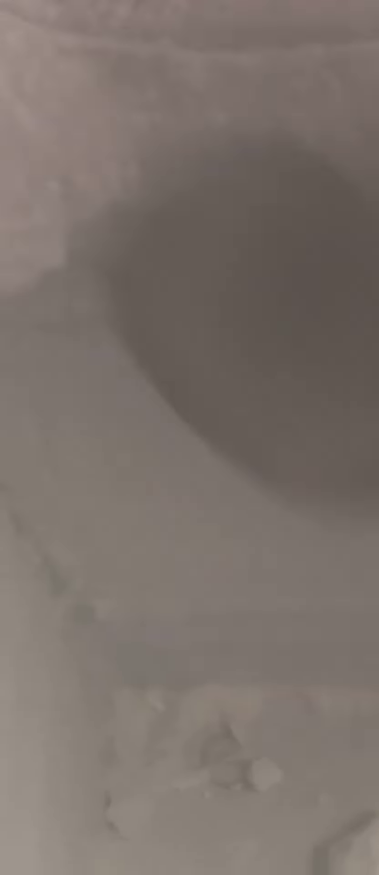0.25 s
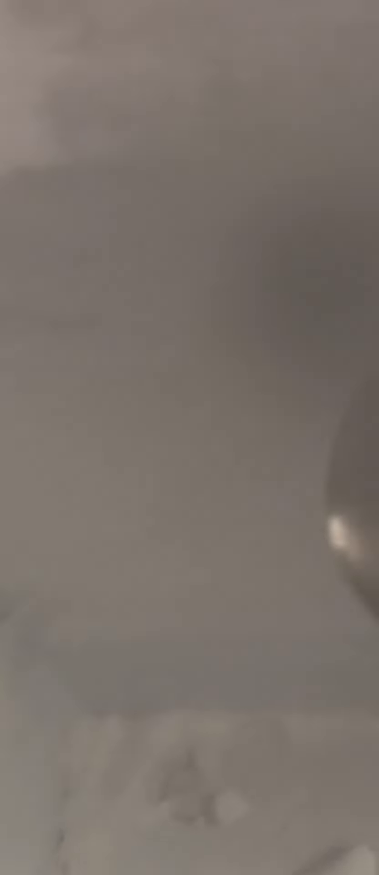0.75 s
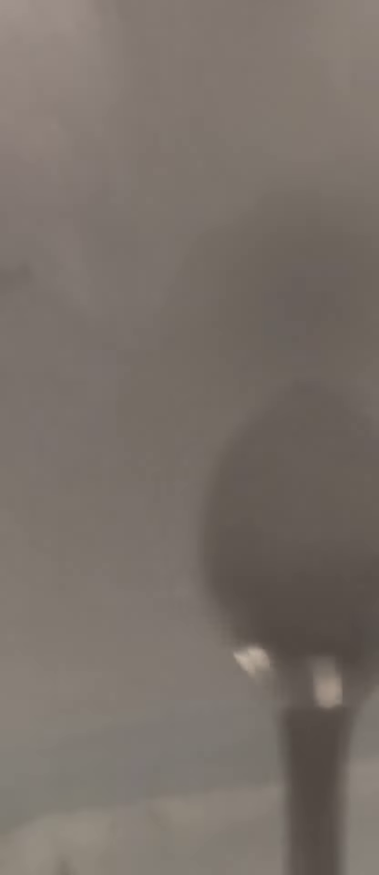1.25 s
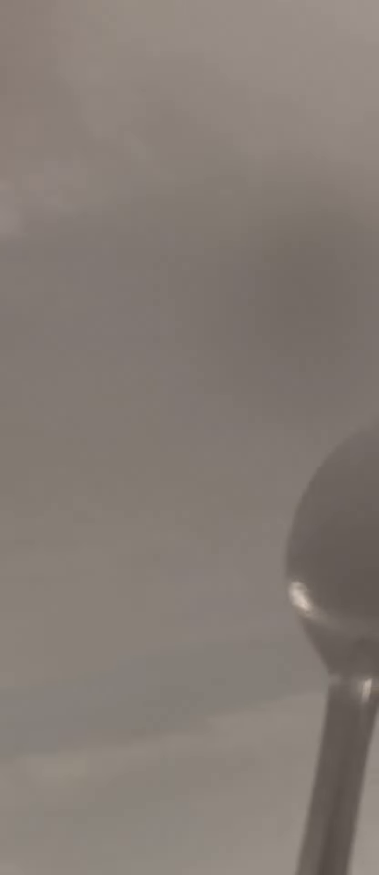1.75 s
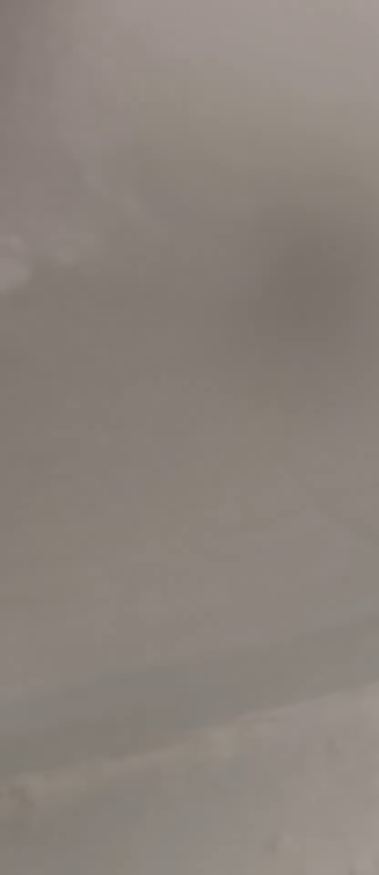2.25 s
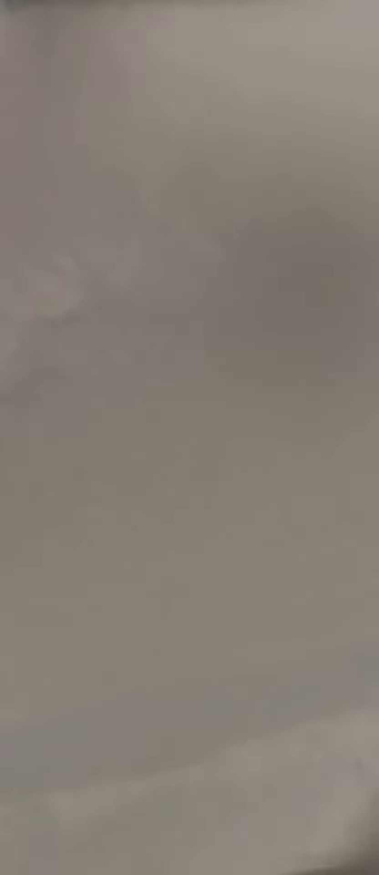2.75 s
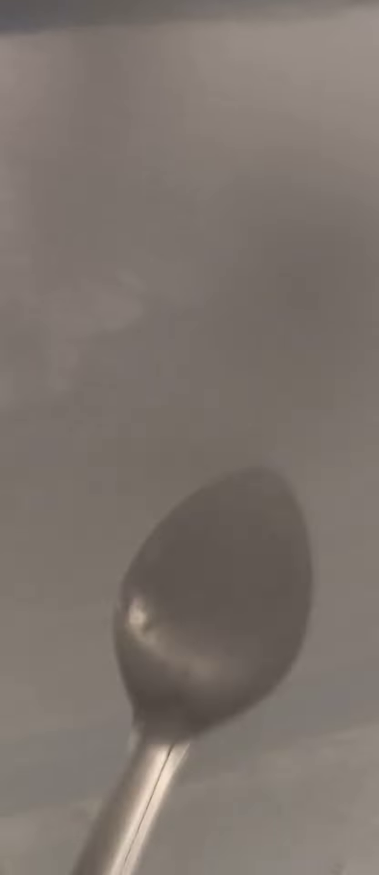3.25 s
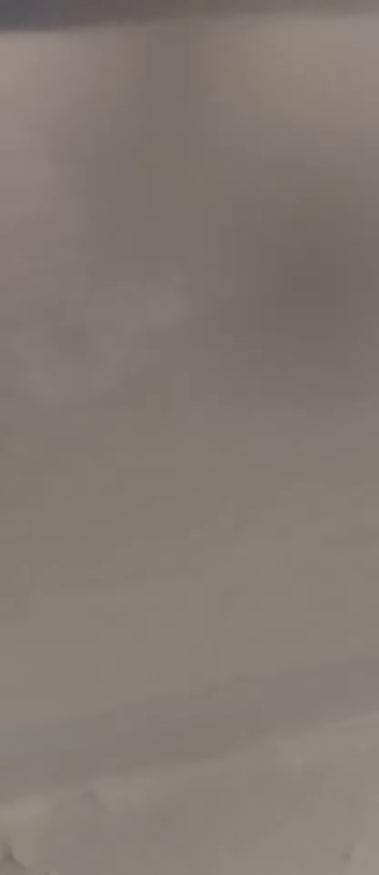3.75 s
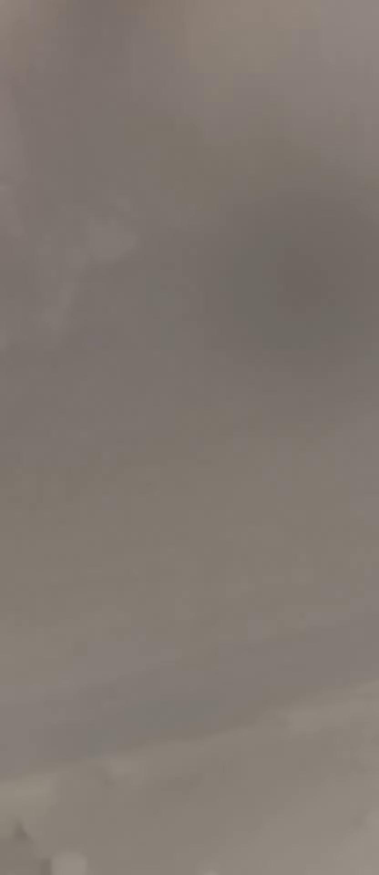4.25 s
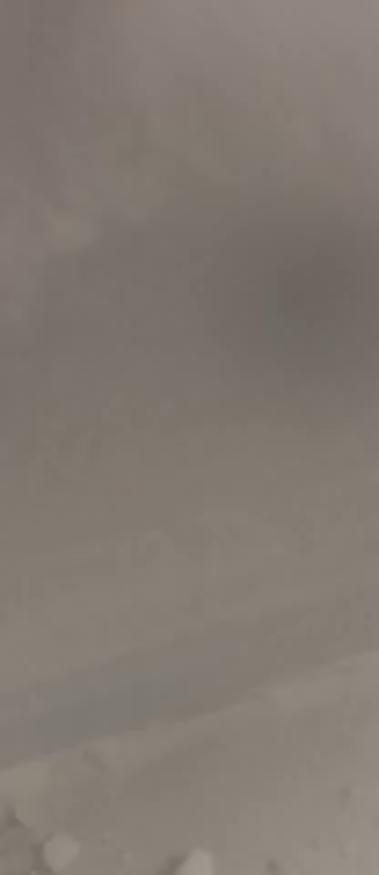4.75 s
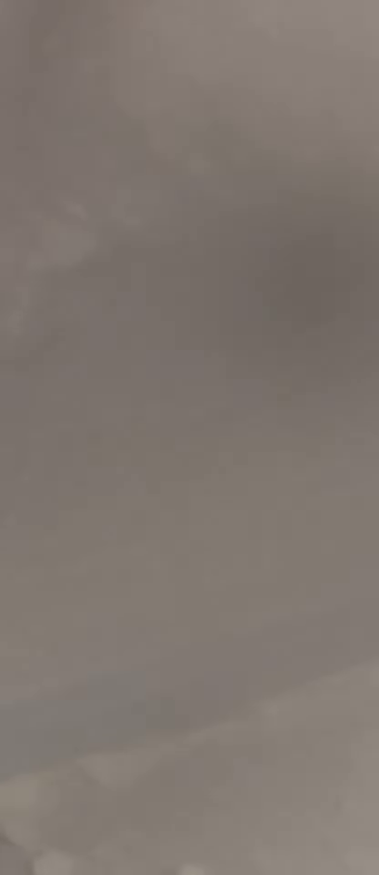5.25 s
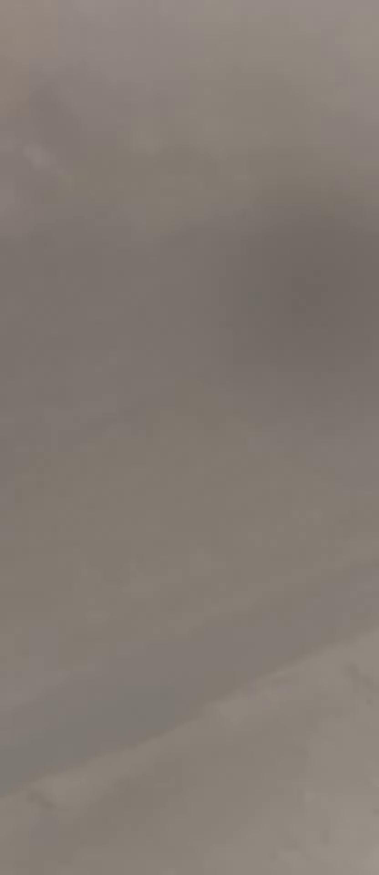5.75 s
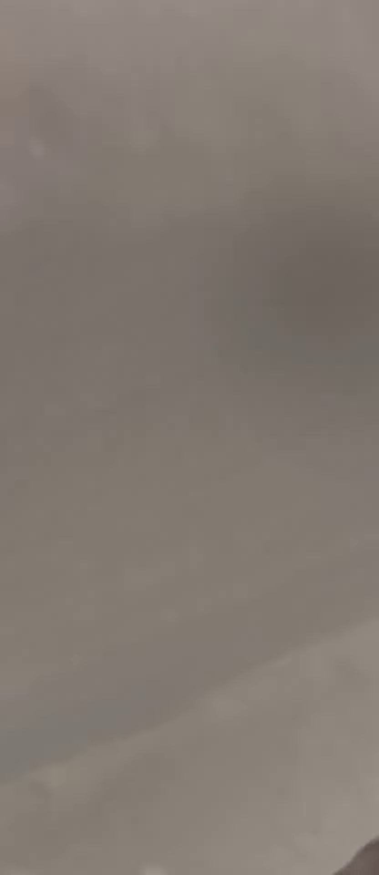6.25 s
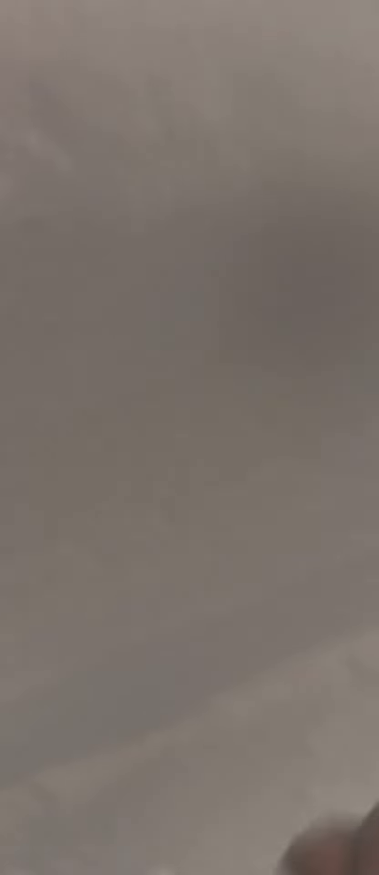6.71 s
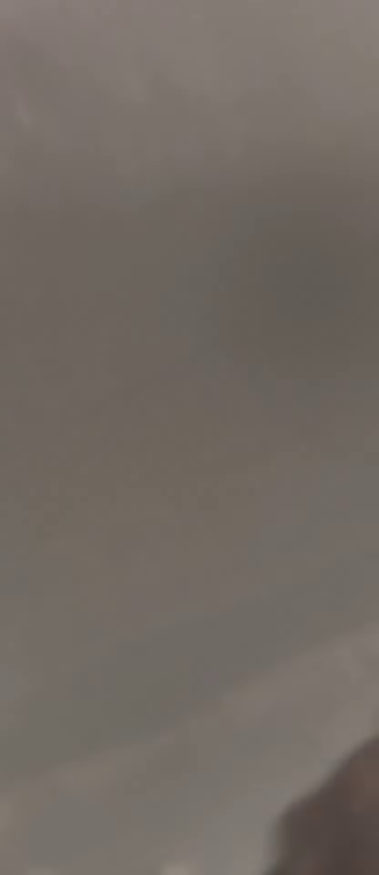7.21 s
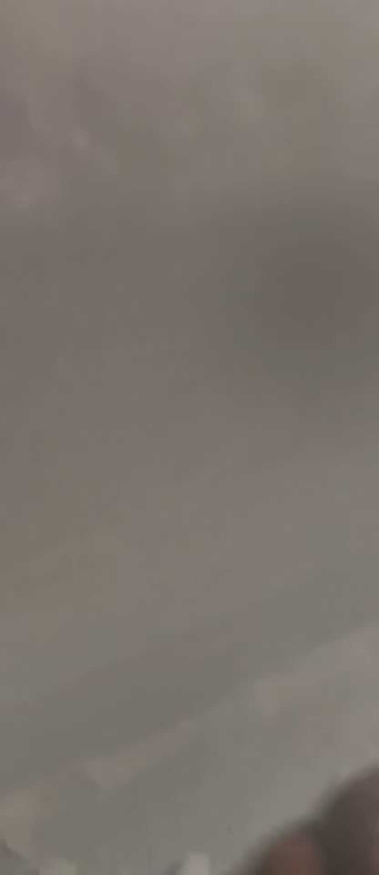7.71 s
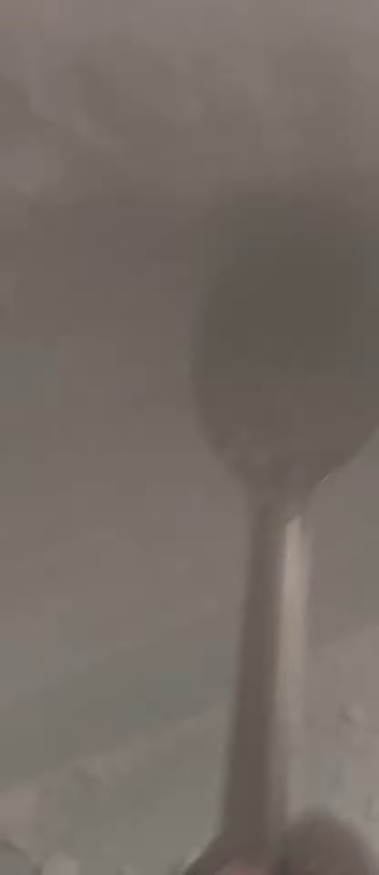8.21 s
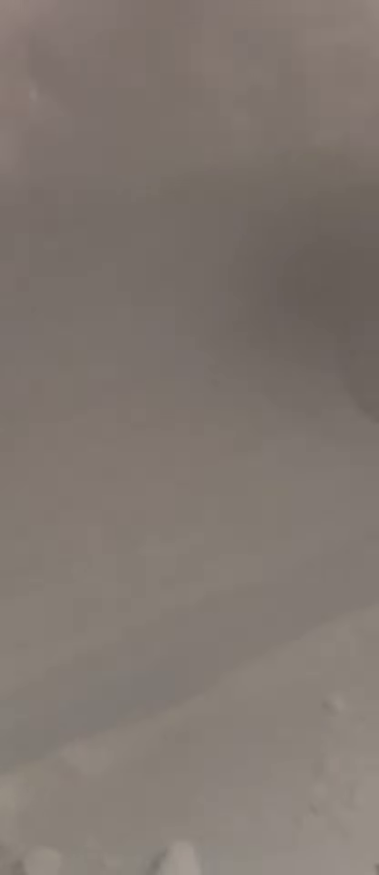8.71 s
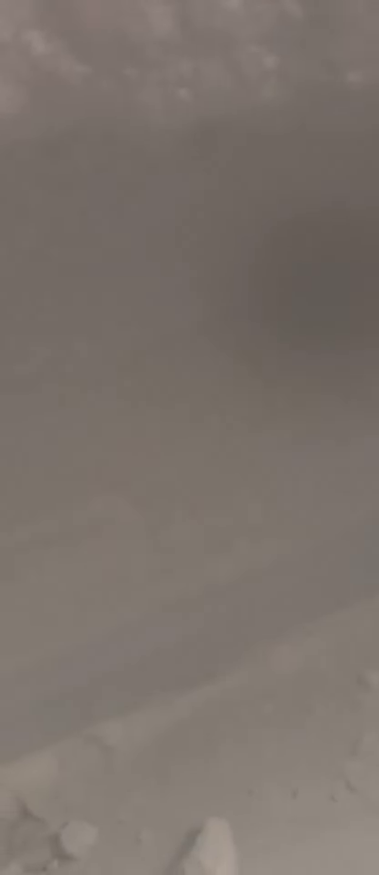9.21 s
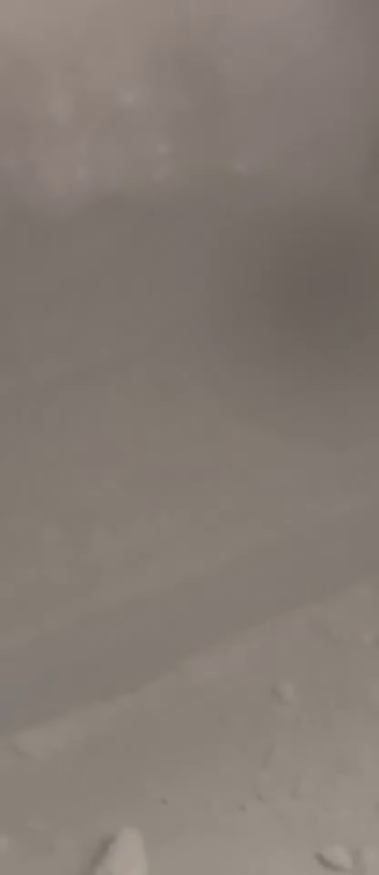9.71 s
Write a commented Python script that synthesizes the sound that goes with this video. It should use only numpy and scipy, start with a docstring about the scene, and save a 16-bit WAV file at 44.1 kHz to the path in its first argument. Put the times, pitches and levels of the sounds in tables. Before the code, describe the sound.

A metal spoon chips thick frost off a freezer wall, right beside a stereo microphone. Sparse light scrapes give way to deep hollow thuds, bright brittle cracks with short icy ringing, and gritty crumbling. The hits are irregular, loudest in the middle and later part; thin squeaky rubs follow near nine seconds. A steady low motor hum with airy rush lies underneath, drifting in level.

```python
"""Inside a freezer cabinet, a metal spoon chips and rasps thick frost off the wall, close to a two-port microphone.
Compressor and fan are steady tones and motor whines over shaped noise, on a background level that steps and drifts.
Knocks are short noise pushes ringing cabinet modes; ice cracks and crumbling drags are bursts of noise grains
that also ring the ice sheet; the spoon sings where rubbing grit drives its narrow modes."""
import sys
import numpy as np
from scipy import signal
from scipy.fft import rfft, irfft
from scipy.io import wavfile
from scipy.ndimage import uniform_filter1d

SR = 44100
rng = np.random.default_rng(int(sys.argv[2]) if len(sys.argv) > 2 else 0)


def to_wav(s):
    """Save 16-bit WAV."""
    ch = np.atleast_2d(s).T  # columns
    pcm = np.round(np.clip(ch, -1, 1) * 32767)  # PCM
    wavfile.write(sys.argv[1], SR, pcm.astype(np.int16))


N = 439677


def undb(db):
    """Amplitude factor for a level in dB."""
    return 10 ** (np.asarray(db) / 20)


def unit(x):
    """Bring to rms 1, all channels taken together."""
    return x / np.sqrt(np.mean(x ** 2))


def on_log(table, hz):
    """Read a (Hz, value) table on a log-frequency axis."""
    f, v = np.transpose(table)
    return np.interp(np.log(hz + 1), np.log(f), v)


def band(x, lo_hz, hi_hz):
    """Band-pass, brought to rms 1."""
    sos = signal.butter(2, [lo_hz, hi_hz], "band", fs=SR, output="sos")
    return unit(signal.sosfilt(sos, x))


def ring(x, hz, t60):
    """One damped mode as a complex one-pole resonator, losing 60 dB in t60 seconds."""
    pole = np.exp(2j * np.pi * hz / SR - np.log(1000) / (t60 * SR))
    return signal.lfilter([1], [1, -pole], x).imag


def width_t60(width_hz):
    """Ring time in seconds of a mode with this bandwidth: narrow modes ring long."""
    return np.log(1000) / (np.pi * width_hz)


def walk(rate):
    """Random levels held 1 / rate s and smoothed twice into a slow drift."""
    k = int(SR / rate)
    steps = np.repeat(rng.standard_normal(N // k + 1), k)
    return uniform_filter1d(uniform_filter1d(steps, k), k)[:N]


def add(out, start_s, sound):
    """Mix a short sound in at its time."""
    i = int(start_s * SR)
    out[:, i:i + sound.shape[1]] += sound[:, :N - i]


def air_rush():
    """Fan and cabinet air: shaped stereo noise, alike at both ports in the bass, each octave flickering alone."""
    # spectrum of the rushing air, relative: (frequency [Hz], density [dB per Hz])
    air_spectrum = [(30, -12.5), (62, -2), (112, -5), (132, -10.5), (160, -7), (300, -7), (350, -8),
                    (400, -12), (850, -16.5), (3000, -26.5), (7700, -37.5), (9760, -43.5), (14500, -39.5),
                    (16100, -52)]
    # likeness of the two ports: (frequency [Hz], left-right correlation [0-1])
    port_likeness = [(60, 0.98), (130, 0.86), (290, 0.63), (640, 0.04), (1410, 0.12), (3100, 0), (6820, 0),
                     (15000, 0.12)]
    # stereo balance: (frequency [Hz], left minus right [dB])
    port_balance = [(60, -3), (110, 1.5), (200, -2), (380, 1), (700, 2), (1290, 0.5), (2380, 1.5),
                    (4400, -1), (8120, 3), (15000, 0.5)]
    hz = np.fft.rfftfreq(N, 1 / SR)
    like = np.clip(on_log(port_likeness, hz), 0, .999)
    pan_db = on_log(port_balance, hz) / 2
    mid, side = rfft(rng.standard_normal((2, N))) * undb(on_log(air_spectrum, hz))
    common, apart = np.sqrt(1 + like) * mid, np.sqrt(1 - like) * side
    pair = np.array([undb(pan_db) * (common + apart), undb(-pan_db) * (common - apart)])
    rush = 0
    for centre_hz in 32 * 2. ** np.arange(10):
        octave = np.clip(1 - np.abs(np.log2((hz + 1) / centre_hz)), 0, 1)
        rush = rush + irfft(pair * octave, N) * undb(0.71 * walk(6))
    return unit(rush)


def motor_tones():
    """Compressor and fan tones: sines whose pitch and level waver slightly."""
    # pitches of the compressor and fan tones [Hz]
    tone_pitches = [58.5, 100.5, 113, 202, 226.2, 292.5, 339.3, 346, 360, 600, 720, 777, 834]
    # one row per pitch: (level re background [dB], left minus right [dB])
    tone_levels = [(-10, 1), (1.5, 1.2), (1, -1), (-18, -16), (6, 1.1), (-6.5, -5.5), (-9.5, -6.5),
                   (-9, -2), (-15, 3), (-15.5, 1), (-14.5, 5.5), (-18.5, -1), (-20, 0)]
    t, out = np.arange(N) / SR, np.zeros((2, N))
    for f, (db, pan_db) in zip(tone_pitches, tone_levels):
        wobble = np.cumsum(.0004 * f * walk(2)) / SR  # in cycles
        sine = np.sqrt(2) * np.sin(2 * np.pi * (f * t + wobble + rng.random()))
        out += sine * undb(db + 0.59 * walk(8.2)) * undb([[pan_db / 2], [-pan_db / 2]])
    return out


def motor_whines():
    """Faint whines of the motor: narrow noise bands with fluttering levels."""
    # (centre [Hz], width [Hz], level re background [dB])
    whine_bands = [(1310, 130, -16), (5100, 50, -30), (7780, 40, -29), (13600, 60, -33)]
    out = np.zeros((2, N))
    for f, width, db in whine_bands:
        noise = rng.standard_normal((2, N))
        out += band(noise, f - width / 2, f + width / 2) * undb(db + 4 * walk(2.5))
    return out


def appliance():
    """Rush, tones and whines of the freezer share one background level that steps and drifts."""
    # background level over time: (time [s], level [dB])
    background_level = [(0.0, -28.5), (2.36, -26.5), (2.52, -27.5), (2.66, -32.5), (3.0, -31), (3.22, -39),
                        (4.25, -39), (4.4, -32.5), (5.52, -33), (5.89, -29), (6.05, -35), (6.78, -37),
                        (7.44, -33), (8.11, -34), (8.75, -33), (9.1, -31), (9.97, -26.5)]
    air_db = 6.5  # re background
    level_db = np.interp(np.arange(N) / SR, *np.transpose(background_level))
    return (undb(air_db) * air_rush() + motor_tones() + motor_whines()) * undb(level_db)


def knocks():
    """The spoon judders into the ice for a few ms; that push rings the cabinet, deep modes swelling last."""
    # modes of the cabinet walls and air: (frequency [Hz], level within its group [dB], t60 [s])
    cabinet_modes = [(69.1, -3, 0.4), (80, -2, 0.099), (111.2, 3, 0.16), (182.3, -2.5, 0.34),
                     (223, -12.5, 0.35), (257, -7, 0.49), (285.2, 4, 0.2), (345, -8.5, 0.21),
                     (452, 4.5, 0.33), (508, 0, 0.39), (538.4, 4.5, 0.21), (648, 4.5, 0.29),
                     (689, -9, 0.15), (812, -7.5, 0.39), (980, 2, 0.19), (1096, -4, 0.073)]
    # knocks on the wall: (time [s], boom 145-400 Hz [dB], deep boom re boom [dB], upper wall modes re boom [dB],
    #                      boom pitch favoured by the spot [Hz], ring length [share of t60])
    knock_hits = [(2.517, -1.5, 4.5, -23, 268, 1.3), (3.036, 4.5, -3, -20, 262, 1.3),
                  (3.66, -11.5, -2.5, -35, 284, 1.3), (4.312, -1, -2, -8, 278, 0.8),
                  (4.335, -4, 8.5, -9, 291, .9), (4.582, -13, -24, -2, 291, 1.2),
                  (5.006, -13.5, -2, -31, 232, .4), (5.854, -12, -15, 4, 312, 1.3),
                  (5.96, 2.5, 1, -16, 317, 0.74), (6.953, -5, 8, -13, 241, 0.88),
                  (7.021, -13, -17, -15, 304, 1.1), (7.369, 2, 0, -18.5, 310, 1.35),
                  (7.591, -3.5, -5, -3, 305, 0.67), (7.805, 1, 2.5, -15, 265, 1.22),
                  (8.196, -12.5, 6, -16, 160, .8), (8.39, -3, -6, -16.5, 284, 1.15)]
    push_s, deep_spot_hz = 0.006, 97.6  # judder time; deep pitch struck best
    off_spot_db_per_oct = 11  # loss of modes away from the favoured pitch
    out, t = np.zeros((2, N)), np.arange(int(.6 * SR)) / SR
    noise = rng.standard_normal((len(knock_hits), 3, len(t)))
    for (s, db, deep_db, upper_db, boom_hz, ring_share), seed in zip(knock_hits, noise):
        groups = np.zeros((3, 2, len(t)))  # deep, boom, upper
        for hz, mode_db, t60 in cabinet_modes:
            g = int(hz > 145) + int(hz > 400)
            late = np.maximum(t - 0.59 / hz, 0)  # a mode needs part of a cycle to answer
            push = late * np.exp(-late / push_s)
            apart = min(hz / 900, 1)  # higher modes reach the two ports differently
            judder = push * (seed[0] * np.sqrt(1 - apart ** 2) + apart * seed[1:])
            rung = unit(ring(judder, hz, t60 * ring_share)) * np.sqrt(t60)
            octaves_off = min(abs(np.log2(hz / (deep_spot_hz, boom_hz, hz)[g])), .8)  # none for upper modes
            groups[g] += undb(mode_db - off_spot_db_per_oct * octaves_off) * rung
        start = groups[:, :, :int(.12 * SR)]
        peaks = 4.5 * np.sqrt(np.mean(start ** 2, axis=(1, 2), keepdims=True))  # peak estimated from rms
        group_db = [db + deep_db, db, db + upper_db]
        add(out, s - .004, np.sum(groups / peaks * undb(group_db)[:, None, None], axis=0))
    stiff = signal.butter(4, 60, "high", fs=SR, output="sos")  # below its first mode the cabinet hardly moves
    return signal.sosfilt(stiff, out) * undb([[-.8], [.8]])


def grit(scatter_db):
    """Dense ice grains of scattered size; the right port gets a lagged copy mixed with grains of its own."""
    port_lag_s, lag_spread_s = .00033, .0003  # the spoon moves about, so the lag between ports drifts
    share = .6  # of the left port's grains heard at the right
    size = np.repeat(rng.exponential(size=N // 40 + 1), 40)[:N]
    own = rng.standard_normal((2, N)) * undb(scatter_db * size)
    lag = np.round((port_lag_s + lag_spread_s * walk(5)) * SR).astype(int)
    lagged = own[0][np.clip(np.arange(N) - lag, 0, N - 1)]
    return np.array([own[0], share * lagged + np.sqrt(1 - share ** 2) * own[1]])


def ice(x):
    """The sheet of ice rings with whatever breaks on it."""
    # modes of the ice sheet: (frequency [Hz], width [Hz], level within the sheet [dB])
    sheet_modes = [(940, 110, -10), (1331, 9.3, 2), (2162, 17, -4.5), (2540, 18, -2.5), (3030, 15, -15.5),
                   (3630, 37, -10.5), (4000, 17, -7), (4280, 51, -21)]
    sheet_db = 7.5  # added to every mode
    out = x
    for hz, width, db in sheet_modes:
        width = max(width, 10)
        pass_gain = 2 * np.pi * width / SR  # a mode passes its own pitch at gain 1
        out = out + undb(db + sheet_db) * pass_gain * ring(x, hz, width_t60(width))
    return out


def cracks():
    """Each crack is a sharp burst of grit around its own pitch; the fizz dies sooner than the body."""
    # ice cracks before the sheet rings: (time [s], edge [dB], body re edge [dB], fizz re edge [dB],
    #                                     edge pitch [Hz], left minus right [dB])
    crack_bursts = [(2.5157, -16, 2.5, -1, 5400, -3.5), (3.0356, -22, -11, -3.5, 2490, -4),
                    (3.651, -43, -7, 6, 2400, -0.5), (4.309, -13, -2, -16, 7550, 8),
                    (4.5843, -10.5, -4.5, -25, 4700, -1), (4.664, -16.5, -7, -22, 6900, -4),
                    (4.75, -29.5, -18, -30, 5300, -1.5), (4.81, -26.5, -6, -16, 6000, -5),
                    (4.817, -34, 4, -24, 6760, -5), (4.8797, -26.5, -6, -13, 4890, -4),
                    (4.9311, -34, -9, -6, 7030, -2), (4.95, -31, -14, 4, 5210, -1),
                    (4.974, -30, 0, -9, 5240, -14), (5.8556, -1, -32, -23, 2700, -2),
                    (5.9576, -8.5, -3.5, -7, 2640, -1), (6.1882, -40, -13, -4, 5660, -3),
                    (6.9446, -20.5, -4, 1, 3550, -7), (7.3685, -12.5, -0.5, 1.5, 3320, -4),
                    (7.587, -12.5, -2, -3.5, 2450, 0.5), (7.805, -12, -9, 2, 3740, -3),
                    (8.1807, -33, 4, 1, 3870, -3), (8.3752, -26, -15, 1, 2870, -4),
                    (8.383, -17, -9, -6, 2280, 4), (8.7594, -33, 4, -15, 3790, -5),
                    (8.9674, -34, -8, -11, 6140, -9), (9.1031, -32.5, 6, -16, 3820, -7),
                    (9.591, -22, -9, -3, 7550, 6)]
    edge_t60_s, shortening = 0.054, 0.22  # t60 at 3 kHz; higher cracks are shorter by this power of pitch
    grains = grit(2.5)
    out, t = np.zeros((2, N)), np.arange(int(.2 * SR)) / SR
    rise = np.minimum(t / .0008, 1)
    held = undb(-29.5) * rise * undb(-60 * t / 0.17)  # the cabinet holds a little of it
    for s, db, body_db, fizz_db, hz, pan_db in crack_bursts:
        piece = grains[:, int(s * SR):int(s * SR) + len(t)]
        t60 = edge_t60_s * (3000 / hz) ** shortening
        body_fade, edge_fade, fizz_fade = [rise * undb(-60 * t / (k * t60)) + held for k in (1.4, 1.0, .8)]
        body = undb(body_db) * band(piece, 310, 1630) * body_fade
        edge = -band(piece, hz / 1.56, hz * 1.43) * edge_fade  # the sign keeps neighbours from cancelling
        fizz = undb(fizz_db) * band(piece, 5400, 15000) * fizz_fade
        add(out, s - .001, (body + edge + fizz) * undb(db + np.array([[pan_db], [-pan_db]]) / 2))
    return out


def drags():
    """Frost crumbling in uneven slips under the edge of the spoon; each drag swells or dies evenly in dB."""
    # drags before the sheet rings: (time [s], length [s], crumble 2-5.5 kHz at start [dB], change to end [dB],
    #                                0.6-2 kHz re crumble [dB], above 5.5 kHz re crumble [dB])
    drag_strokes = [(.46, .08, -43, -12, -3, 5), (2.533, .12, -50, -6, -8, 9),
                    (3.09, 0.14, -60.5, 6, -4, 10), (4.302, 0.0077, -29, 16, -11, -3),
                    (4.309, 0.07, -14, -29, -2.5, 1), (4.572, .012, -49, 11, -8, 12),
                    (4.592, 0.072, -30, -16, 5, -6), (4.82, .03, -34.5, -12, -1, -5),
                    (4.848, 0.051, -44.5, 1, -6, 6), (4.95, .07, -50, -3, -6, -2.5),
                    (5.873, .085, -20, -14, 3.5, -33), (5.954, 0.0093, -27.5, 1, -11, 10),
                    (5.97, 0.25, -33.5, -20.5, 2, -27), (6.949, 0.036, -26.5, -23, 2, 2.5),
                    (6.984, 0.05, -49, -4, -6, 7), (7.385, .06, -33, -25, -1, 1),
                    (7.588, .03, -17, -30, -5, -19), (7.818, 0.079, -34.5, -20, 10, 6.5),
                    (8.163, 0.24, -50, 1, 7, 4), (8.388, 0.074, -22, -22, 3, -3.5),
                    (8.462, .14, -50, -6, -3, 5), (8.665, 0.046, -44, -9, -4, 0),
                    (8.736, .06, -54, -3, -6, 7), (8.816, 0.1, -47, -15, -6, 9),
                    (8.96, .19, -52.5, 4.5, 0, 7)]
    grains = grit(1.8) * undb(0.67 * walk(60))
    body = band(grains, 600, 2000)
    crumble = -band(grains, 2000, 5500)  # the sign keeps neighbours from cancelling
    fizz = band(grains, 5500, 15500)
    out = np.zeros((2, N))
    for s, length, db, change_db, body_db, fizz_db in drag_strokes:
        t = np.arange(int(length * SR)) / SR
        cut = slice(int(s * SR), int(s * SR) + len(t))
        edges = np.clip(np.minimum(t, t[-1] - t) / 0.0012, 0, 1)
        shape = edges * undb(db + change_db * t / t[-1])
        out[:, cut] += shape * (undb(body_db) * body[:, cut] + crumble[:, cut] + undb(fizz_db) * fizz[:, cut])
    return out


def squeals():
    """Short rubs of grit that ring the spoon's modes, family by family."""
    # modes of the spoon bowl, one list per family: (frequency [Hz], width [Hz], level within its family [dB])
    spoon_families = [
        [(3805, 28, 0)],
        [(5240, 20, 0), (5520, 50, -14)],
        [(6125, 28, 0)],
        [(7760, 35, -5), (8270, 60, -4), (8840, 40, -5)],
        [(10850, 70, -1), (12000, 70, -9), (12800, 100, -11), (14100, 70, -11), (15200, 60, -11)],
    ]
    # rubs: (time [s], length [s], drive of the 3.8 kHz family [dB], 5.2 kHz family [dB], 6.1 kHz family [dB],
    #        both upper families [dB])
    squeal_rubs = [(0.038, .065, -56, -56, -58, -45), (.475, 0.031, -50, -50, -52, -41),
                   (0.91, 0.056, -56, -56, -41, -58), (2.537, 0.067, -54, -50, -52, -45),
                   (3.085, .045, -60, -57, -62, -54), (3.13, 0.083, -59, -57, -50, -48),
                   (4.309, 0.036, -43, -32, -41, -39), (4.97, 0.028, -37, -37, -48, -40),
                   (6.995, 0.05, -44, -37, -39, -40.5), (7.395, .045, -54, -50, -58, -48),
                   (8.173, .045, -43.5, -45, -48, -42), (8.228, 0.089, -44, -44, -49, -39.5),
                   (8.53, 0.054, -52, -45, -54, -42), (8.712, 0.07, -40, -55, -41, -42),
                   (8.797, 0.1, -43, -55, -44, -43), (8.956, .075, -44, -54, -43, -46),
                   (9.031, .115, -35.5, -54, -41, -46)]
    chatter_db, chatter_rate = 2.5, 90  # each family catches and slips on its own; rate per second
    grains, out = grit(.8), np.zeros((2, N))
    drive = np.zeros((len(spoon_families), N))
    for s, length, *family_db in squeal_rubs:
        rub = np.hanning(int(length * SR)) ** .25
        all_db = family_db + family_db[-1:]  # the last level serves both upper families
        add(drive, s, undb(all_db)[:, None] * rub)
    for family, rubbing in zip(spoon_families, drive):
        rubbed = grains * rubbing * undb(chatter_db * walk(chatter_rate))
        for hz, width, db in family:
            steady = np.sqrt(4 * np.pi * width / SR)  # rms 1 under steady rubbing by rms 1 noise
            out += undb(db) * steady * ring(rubbed, hz, width_t60(width))
    return out


def scene():
    """Freezer hum, cabinet knocks, breaking ice ringing its sheet, and the singing spoon."""
    return appliance() + knocks() + ice(cracks() + drags()) + squeals()


def record(dry):
    """The microphone drops the deepest bass, peaks beyond full scale clip, and the top is cut."""
    low_cut_hz, top_hz = 45, 16000
    low_cut = signal.butter(2, low_cut_hz, "high", fs=SR, output="sos")
    top_cut = signal.ellip(8, .2, 60, top_hz, fs=SR, output="sos")
    clipped = np.clip(signal.sosfilt(low_cut, dry), -1, 1)
    return np.clip(signal.sosfilt(top_cut, clipped), -1, 1)


dry = scene()
out = record(dry)
to_wav(out)
```